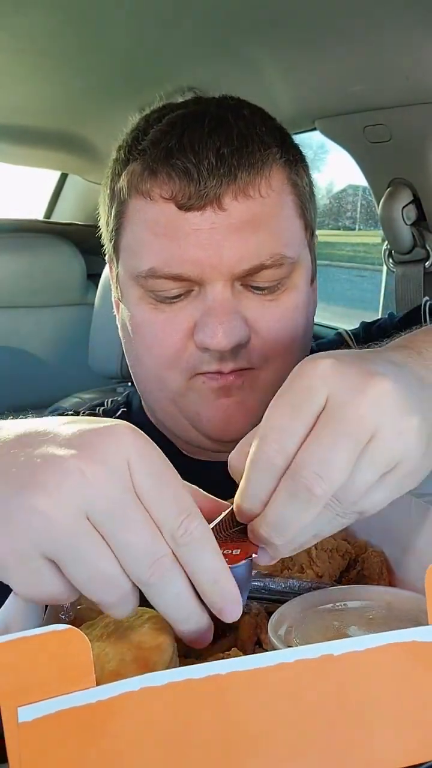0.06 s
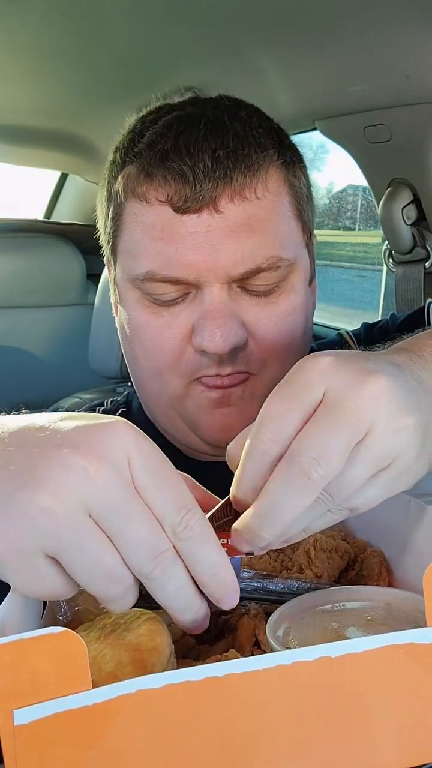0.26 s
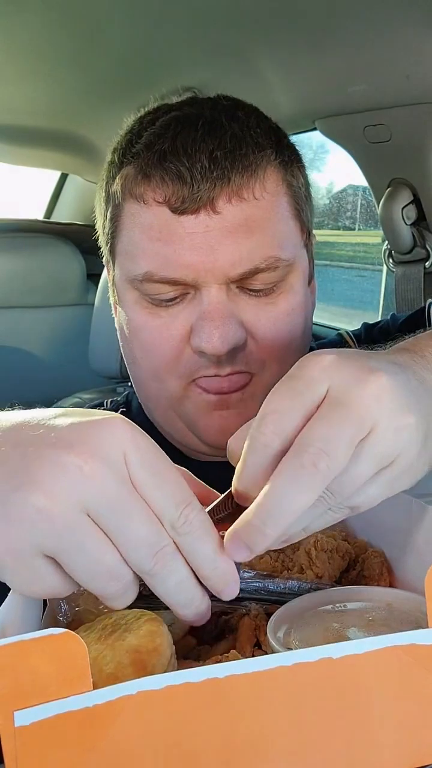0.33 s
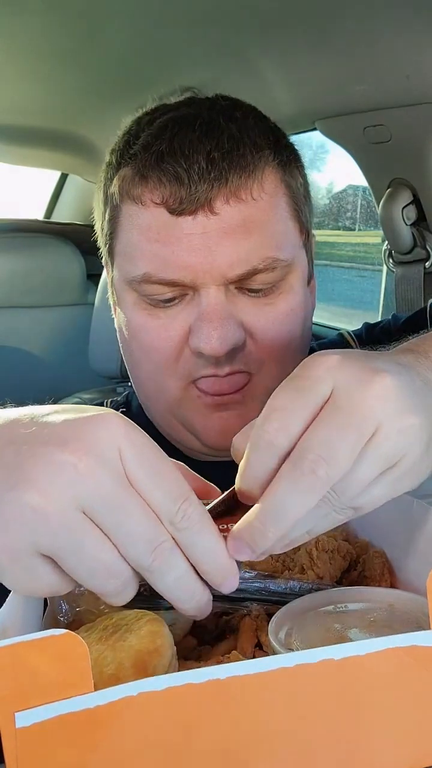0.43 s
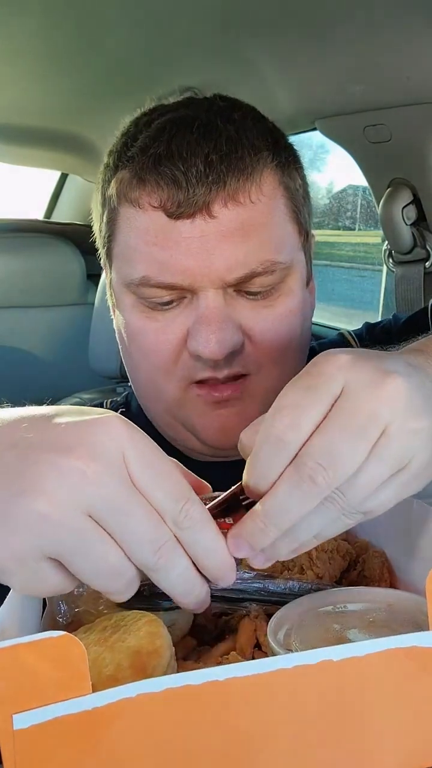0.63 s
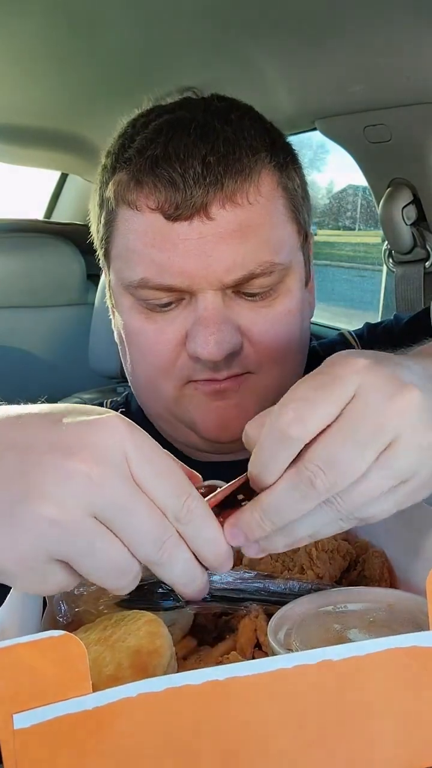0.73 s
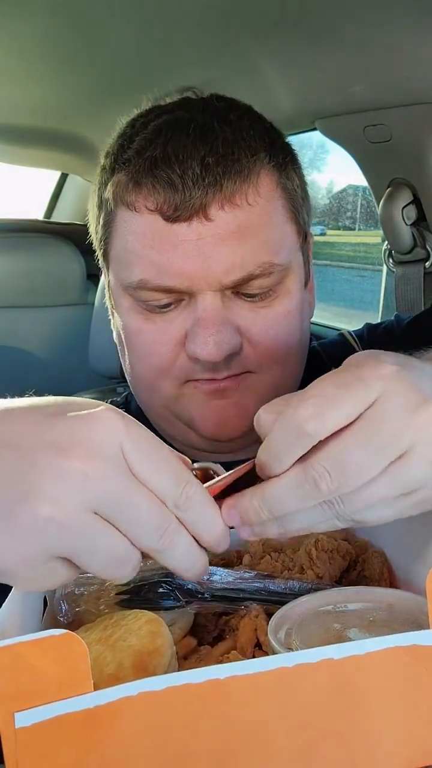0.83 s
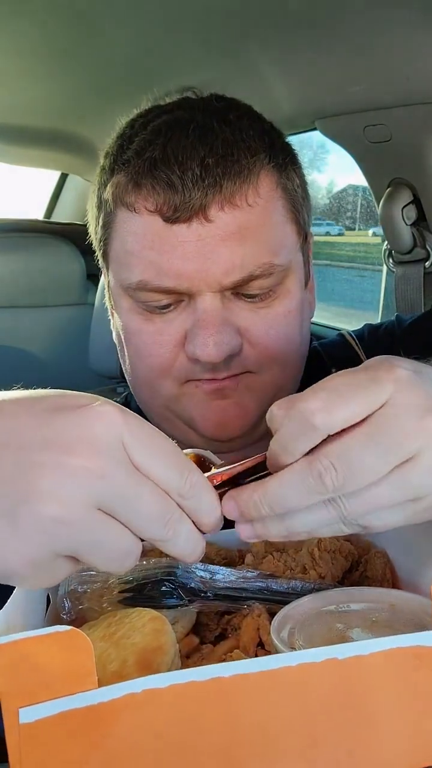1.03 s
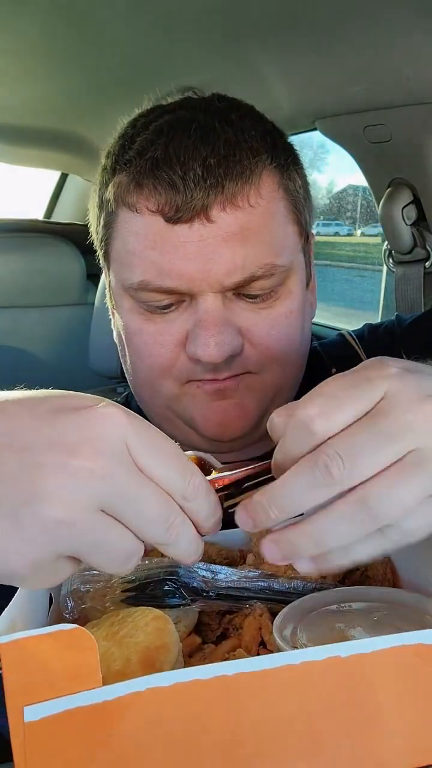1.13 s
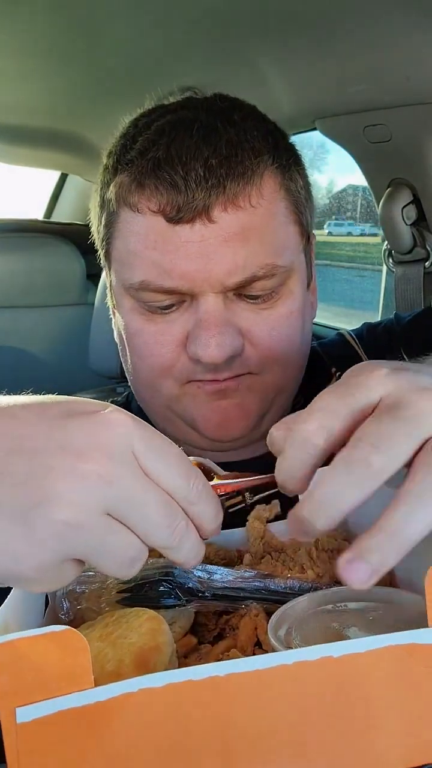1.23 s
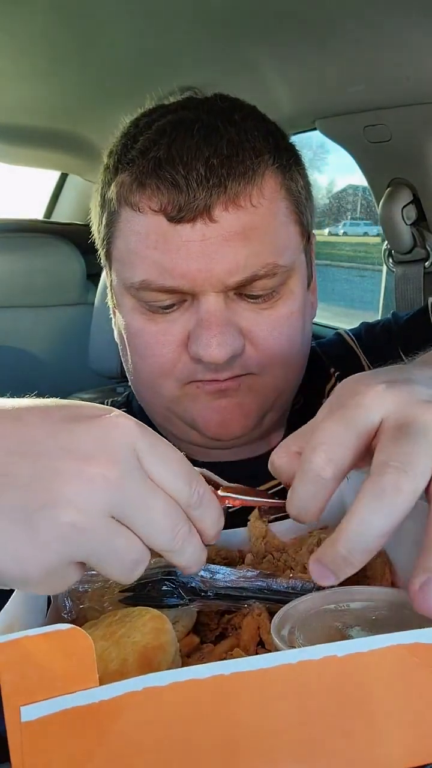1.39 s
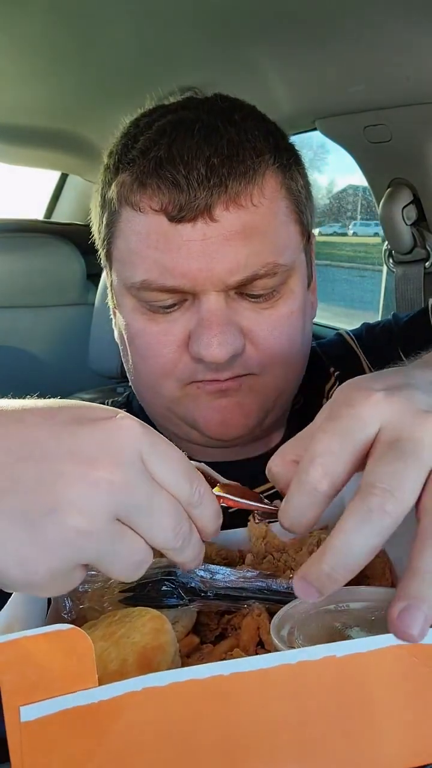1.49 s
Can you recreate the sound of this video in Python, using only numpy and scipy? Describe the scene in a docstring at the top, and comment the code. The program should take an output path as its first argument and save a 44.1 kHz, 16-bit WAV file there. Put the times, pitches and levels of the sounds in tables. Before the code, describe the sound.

A small plastic sauce packet crinkles close to a phone microphone in a parked car. Faint ticks and fingertip scuffs lead to a sharp burst at 0.2-0.27 s, snaps near 0.45 s, then the loudest, densest crackle at 0.6-0.76 s with tiny hollow pops. It thins after 0.85 s; crisp ticks at 1.15-1.3 s and 1.5 s. Faint wavering hum and a barely audible dull outside swell around 0.8 s.

```python
"""Sauce packet in a parked car

Fingers crinkle and tear a small plastic sauce packet, close to a phone's microphone in a parked car.
Creases buckle with sharp snaps and panels pop hollow, over fine random crackle and dull fingertip scuffs.
Film sounds are clicks ringing spectral filters; pops are decaying sines. All but the scuffs get short
reflections from hands and cabin. Behind lie a wavering hum, noise rumble and one dull, distant-sounding swell.
"""
import sys
import numpy as np
from scipy import signal
from scipy.fft import rfft, irfft
from scipy.io import wavfile

SR = 44100
rng = np.random.default_rng(int(sys.argv[2]) if len(sys.argv) > 2 else 0)


def dump(signal):
    """Clip the signal to [-1, 1] and save it as 16-bit WAV at the path in sys.argv[1]."""
    limited = np.clip(np.atleast_2d(signal).T, -1, 1)
    pcm = np.round(limited * 32767).astype(np.int16)
    wavfile.write(sys.argv[1], SR, pcm)


N = 68355

# Car hum partials: pitch_hz, level_db [Hz, dB]
HUM = [(55.2, -58), (110.6, -58), (166, -71.5)]
# Spectrum of the car's rumble and hiss: frequency_hz, relative_level_db [Hz, dB]
RUMBLE_COLOUR = [(20, -4.5), (35, -19), (55, -0.5), (75, -4.5), (95, -7), (125, 0), (160, -6.5), (200, -13),
                 (250, -8), (320, -20.5), (450, -21.5), (600, -22.5), (1200, -23.5), (2500, -31.5),
                 (5000, -39), (7500, -46), (10000, -43), (13000, -36), (13500, -65)]
# Spectrum of the swell, likely traffic outside: frequency_hz, relative_level_db [Hz, dB]
TRAFFIC_COLOUR = [(150, -19), (300, -4), (370, -9.5), (450, 1.5), (540, -15), (1200, -12.5), (4000, -42)]
# Decay time of the cabin tail by 60 dB: frequency_hz, t60_s [Hz, s]
CABIN_T60 = [(200, 0.049), (1000, 0.058), (3000, 0.08), (7500, 0.054), (13000, 0.023)]
# Fingertips sliding on the film: start_s, length_s, level_db [s, s, dB]
RUBS = [(0.046, 0.016, -59), (0.136, 0.17, -64), (0.316, 0.096, -60.5), (0.854, 0.025, -50.5)]
# Spectrum of the rubs: frequency_hz, relative_level_db [Hz, dB]
RUB_COLOUR = [(150, -24), (500, -3), (1200, 0), (2100, 3.5), (3000, -3), (7500, -3.5), (11000, -26)]
# Crackle effort as the film is worked, before the register levels: time_s, level_db [s, dB]
WORK = [(0, -60.5), (.08, -66), (.17, -57), (.235, -40), (.275, -40.5), (.305, -56), (.35, -51),
        (.395, -59.5), (.445, -51), (0.488, -35.5), (.52, -48), (.565, -56), (0.596, -52.5), (.635, -36.5),
        (0.679, -37.5), (.695, -49.5), (.785, -44.5), (.825, -52), (.875, -48), (.91, -55.5), (1.02, -57.5),
        (1.06, -52.5), (1.115, -57.5), (1.16, -49), (1.215, -53), (1.26, -50), (1.281, -43), (1.315, -54),
        (1.37, -65), (1.391, -48), (1.445, -62.5), (1.55, -54.5)]
# Crackle level of each register on top of WORK: top_db, treble_db, middle_db, low_db [dB]
CRACKLE_REGISTER_DB = (-14.5, -1.5, -10, -17)
# The four registers in which the film rings at the microphone: frequency_hz, relative_level_db [Hz, dB]
TOP = [(6500, -41.5), (9000, 3), (10000, -3.5), (11900, -2.5), (13000, -9.5), (13500, -26)]
TREBLE = [(2000, -87), (4500, -49.5), (5600, -21), (6500, -6), (7250, -1.5), (7900, -1.5), (8600, -7),
          (9600, -36), (13000, -72.5)]
MIDDLE = [(1200, -47), (2700, -23), (3050, -8.5), (3380, -0.5), (3750, -6), (4280, 1), (4650, -3.5),
          (5400, 1.5), (6500, 0), (10000, -48)]
LOW = [(100, -28), (350, -23), (620, -16.5), (850, -13), (1200, -7), (1600, -2.5), (1950, -2.5),
       (2200, 6.5), (2550, -1), (3400, -8), (7000, -53)]
# Whole panels of the packet popping through: start_s, pitch_hz, level_db [s, Hz, dB]
POPS = [(.2152, 2187, -37.5), (0.478, 1146, -43), (.6245, 640, -48.5), (.6245, 1135, -47.5),
        (0.7022, 1880, -41), (0.758, 1355, -46.5), (1.045, 700, -54.5)]
# Creases buckling: start_s, top_db, treble_db, middle_db, low_db, facet_pitch_hz, crease_pitch_hz,
# give_way_s [s, dB, dB, dB, dB, Hz, Hz, s]; the facet is the flat piece that flips
SNAPS = [(.108, -51.5, -51, -66, -65, 5680, 8000, 0.0032),
         (.1311, -60, -48.5, -49.5, -48.5, 3180, 7500, 0.00038),
         (.1845, -51, -36, -48, -46.5, 3530, 7800, 0.002), (.2115, -42, -37, -50, -56, 3380, 7800, 0.0009),
         (.2152, -30, -20.5, -27.5, -47, 4200, 8000, 0.00032),
         (.243, -36, -34, -41, -61, 5300, 7860, 0.0069),
         (.259, -33.5, -21.5, -33.5, -48, 5440, 8000, 0.00083),
         (.270, -39, -22.5, -34, -68, 5540, 7900, 0.0015),
         (.3627, -56, -40, -39.5, -54.5, 4440, 6740, 0.00069),
         (.404, -50.5, -39, -42, -57, 5300, 7300, 0.0046),
         (.4526, -35, -21, -33.5, -48, 3550, 6900, 0.00057),
         (.455, -33, -24, -40, -45.5, 3360, 7400, 0.0011),
         (.4775, -35, -30.5, -30.5, -46, 3500, 7600, 0.0024),
         (.485, -33, -26.5, -36.5, -55, 4200, 7700, 0.0043),
         (.5226, -60, -40, -42, -54, 3360, 7700, 0.00092),
         (.5365, -57, -35.5, -54, -59, 5100, 7600, 0.0035),
         (.6075, -39, -13.5, -28, -41, 5750, 7100, .0018),
         (.61, -34.5, -17, -29, -63, 5470, 7350, 0.000083),
         (.6236, -35, -21.5, -28, -37, 5700, 7300, 0.001), (.627, -30, -15, -38, -56, 5640, 7760, 0.0014),
         (.6311, -36, -17.5, -29.5, -42.5, 3400, 7300, 0.00076),
         (.6365, -33.5, -22, -35.5, -47, 3270, 7850, 0.0041),
         (.6545, -42, -33, -32.5, -55, 3180, 7200, .0017), (.6604, -44, -31, -32, -61, 5900, 6700, 0.00087),
         (.668, -35, -19.5, -30, -48, 3240, 7270, 0.0012), (.674, -38, -23, -32.5, -44, 3300, 7830, 0.0013),
         (.7015, -40.5, -30.5, -31.5, -39.5, 6000, 7800, 0.0023),
         (.758, -38, -22, -33, -36.5, 4050, 7440, 0.00016),
         (.7593, -46, -16.5, -32, -42.5, 5240, 7170, .0003),
         (.7635, -46, -38, -29, -41, 3920, 8400, 0.0021),
         (.7935, -39.5, -26.5, -38, -45, 4300, 7200, 0.0031),
         (.835, -52, -30, -47, -52, 3500, 7600, 0.00074), (.8521, -46, -33, -56, -57, 5700, 7760, .00066),
         (.9835, -62, -36.5, -50, -53, 5030, 7400, 0.0016),
         (1.045, -73, -42, -52.5, -56, 3660, 7400, 0.0043),
         (1.1514, -51, -22.5, -44, -51, 4930, 7400, 0.00088),
         (1.158, -50, -32.5, -41, -49, 4800, 7300, 0.00089),
         (1.1746, -55, -43, -52, -57, 3400, 8000, 0.00049),
         (1.1935, -46.5, -48, -34.5, -61, 4900, 7800, 0.00021),
         (1.1955, -60, -30.5, -56, -55, 4610, 7550, 0.00063),
         (1.2267, -61, -40, -51, -54, 5680, 7700, .0031),
         (1.2434, -62, -32, -40.5, -48.5, 5030, 7740, 0.00012),
         (1.307, -61, -33, -42.5, -62, 5930, 7950, .0002), (1.4988, -59, -48, -56, -55, 5400, 7900, 0.0019),
         (1.525, -48.5, -35, -31.5, -51, 5260, 7600, 0.00012)]

HUM_WAVER_HZ, HUM_SWAY = 2.5, .2  # rms pitch waver at the second partial; rms level sway as a share
RUMBLE_DB = -54.5
TRAFFIC_PEAK_S, TRAFFIC_HALF_WIDTH_S, TRAFFIC_DB = 0.83, 0.14, -62.5
NEAR_DECAY_S, NEAR_DB = 0.0024, -4  # reflections off hands and box, relative to the direct sound
CABIN_DB = -10  # tail energy relative to the direct sound
CRACKLE_PER_S, CRACKLE_SPREAD_DB = 2000, 3.5
POP_DECAY_S = 0.0041
SNAP_S = 0.0018  # snap and pop levels are total energy stated as rms over this time
SLIP_DB, SLIP_REFERENCE_S = -3.5, 0.00051  # slips against the first jump, for a crease of this give-way time
SLIP_SWELL = 0.74  # time constant of the slips' build-up, as a share of the give-way time
FACET_DB, CREASE_DB = 11, 8  # lift of each pitch above its register's spectrum
RESONANCE_HALF_WIDTH_HZ = 420
EDGE_HZ = 13900


def amp(db):
    """Decibels to gain."""
    return 10 ** (np.asarray(db) / 20)


def evened(x):
    """Scales to rms 1."""
    return x / np.sqrt(np.mean(x ** 2) + 1e-20)


def with_energy(sound, db):
    """Scales a short sound to the energy of this rms level held for SNAP_S."""
    return amp(db) * np.sqrt(SNAP_S * SR) * sound / np.linalg.norm(sound)


def read(points, hz):
    """Reads a table on a log-frequency axis."""
    f, value = np.transpose(points)
    return np.interp(np.log(hz + 1), np.log(f + 1), value)


def add(mix, start_s, sound):
    """Mixes a sound in at its start time."""
    part = mix[max(round(start_s * SR), 0):][:len(sound)]
    part += sound[:len(part)]


def noise(colour, size):
    """Random noise of rms 1 with the given spectrum."""
    gain = amp(read(colour, np.fft.rfftfreq(size, 1 / SR)))
    return evened(irfft(rfft(rng.standard_normal(size)) * gain, size))


def drift(rate_hz):
    """Slow random wander of rms 1: noise under a Gaussian low-pass."""
    gain = np.exp(-(np.fft.rfftfreq(N, 1 / SR) / rate_hz) ** 2)
    return evened(irfft(rfft(rng.standard_normal(N)) * gain, N))


def ring(colour, pitch_hz=0, lift_db=0, size=2048):
    """Minimum-phase film response of unit energy, with the given spectrum and an optional resonance."""
    hz = abs(np.fft.fftfreq(size, 1 / SR))
    resonance_db = lift_db / (1 + ((hz - pitch_hz) / RESONANCE_HALF_WIDTH_HZ) ** 2)
    log_gain = np.log(amp(read(colour, hz) + resonance_db))
    # The Hilbert transform of the log gain gives the phase that makes the response causal
    response = np.fft.ifft(np.exp(np.conj(signal.hilbert(log_gain)))).real[:size // 2]
    return response / np.linalg.norm(response)


def taps(t, decay_s, share):
    """Sparse random clicks of unit energy that die away."""
    clicks = rng.standard_normal(len(t)) * (rng.random(len(t)) < share)
    clicks = clicks * np.exp(-t / decay_s)
    return clicks / (np.linalg.norm(clicks) + 1e-12)


def space(size=6144):
    """Path to the microphone: direct sound, close reflections and a short cabin tail."""
    t = np.arange(size) / SR
    hz, when, bands = signal.stft(rng.standard_normal(size), SR, nperseg=128)
    decay = amp(-60 * when / read(CABIN_T60, hz)[:, None])
    tail = signal.istft(bands * decay, SR)[1][:size]
    tail = tail * np.clip(t / 0.0077, 0, 1)  # the tail fades in over 7.7 ms
    path = amp(CABIN_DB) * tail / np.linalg.norm(tail)
    add(path, .0008, amp(NEAR_DB) * taps(t, NEAR_DECAY_S, .3))
    path[0] += 1  # direct sound
    return path


def car():
    """Low sine partials waver together in pitch and sway separately in level, over rumble and hiss."""
    t = np.arange(N) / SR
    waver_turns = np.cumsum(HUM_WAVER_HZ * drift(rate_hz=4.12)) / SR
    out = amp(RUMBLE_DB) * noise(RUMBLE_COLOUR, size=N)
    for pitch_hz, level_db in HUM:
        sway = 1 + HUM_SWAY * drift(rate_hz=6.1)
        turns = pitch_hz * t + waver_turns * pitch_hz / HUM[1][0] + rng.random()
        out += amp(level_db) * evened(sway * np.sin(2 * np.pi * turns))
    return out


def traffic():
    """A muffled swell of noise, likely traffic outside, rises and falls on a bell-shaped curve."""
    from_peak = (np.arange(N) / SR - TRAFFIC_PEAK_S) / TRAFFIC_HALF_WIDTH_S
    return amp(TRAFFIC_DB) * noise(TRAFFIC_COLOUR, size=N) / (1 + from_peak ** 2)


def rubs():
    """Fingertips slide on the film: short dull scuffs of noise that rise faster than they fall."""
    out = np.zeros(N)
    for start_s, length_s, level_db in RUBS:
        progress = np.arange(0, length_s, 1 / SR) / length_s
        pressure = np.sin(np.pi * progress ** .5)
        scuff = pressure * noise(RUB_COLOUR, size=8192)[:len(progress)]
        add(out, start_s, amp(level_db) * evened(scuff))
    return out


def crackle():
    """Tiny wrinkles click at random while the fingers work the film, ringing it in four registers."""
    effort = amp(np.interp(np.arange(N) / SR, *np.transpose(WORK)))
    strength = amp(CRACKLE_SPREAD_DB * np.minimum(rng.exponential(1, N), 3.5))
    wrinkles = (rng.random(N) < CRACKLE_PER_S / SR) * strength
    out = np.zeros(N)
    for level_db, colour in zip(CRACKLE_REGISTER_DB, (TOP, TREBLE, MIDDLE, LOW)):
        film = signal.fftconvolve(ring(colour), space())
        film = film / np.linalg.norm(film)
        clicks = evened(wrinkles * rng.choice([-1, 1], N))
        out += amp(level_db) * signal.fftconvolve(effort * clicks, film)[:N]
    return out


def pops():
    """A panel flips and rings hollow for a few milliseconds, echoed by hands and cabin."""
    out, t = np.zeros(N), np.arange(2048) / SR
    for start_s, pitch_hz, level_db in POPS:
        onset = np.minimum(t * pitch_hz, 1)  # rises over one cycle
        panel = np.sin(2 * np.pi * pitch_hz * t) * np.exp(-t / POP_DECAY_S) * onset
        add(out, start_s, with_energy(signal.fftconvolve(panel, space()), level_db))
    return out


def snaps():
    """A crease jumps, then slips on; slow creases slip more strongly. The film rings in four registers."""
    out, t = np.zeros(N), np.arange(1024) / SR
    top, low = ring(TOP), ring(LOW)
    for start_s, *levels_db, facet_hz, crease_hz, give_s in SNAPS:
        slips = taps(t, give_s, .4) * (1 - np.exp(-t / (SLIP_SWELL * give_s)))
        slip_gain = amp(SLIP_DB) * (give_s / SLIP_REFERENCE_S) ** 1.1
        push = slip_gain * slips / np.linalg.norm(slips)
        push[0] += 1  # the first jump
        heard = signal.fftconvolve(push, space())
        treble = ring(TREBLE, crease_hz, CREASE_DB)
        middle = ring(MIDDLE, facet_hz, FACET_DB)
        for level_db, film in zip(levels_db, (top, treble, middle, low)):
            add(out, start_s, with_energy(signal.fftconvolve(heard, film), level_db))
    return out


def scene():
    """The packet in the fingers, with the car and the outside behind it."""
    return (car() + traffic() + rubs() + crackle() + pops() + snaps())[None]


def record(dry):
    """The recorder's upper band limit, a linear-phase low-pass."""
    low_pass = signal.firwin(255, EDGE_HZ, window=("kaiser", 8), fs=SR)
    return signal.oaconvolve(dry, low_pass[None], "same")


dry = scene()
out = record(dry)
dump(out)
```